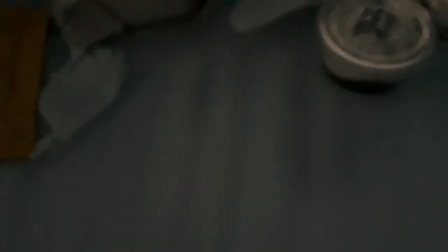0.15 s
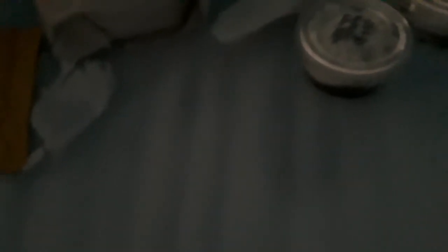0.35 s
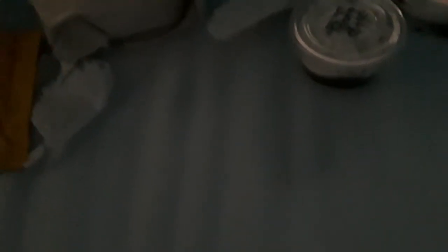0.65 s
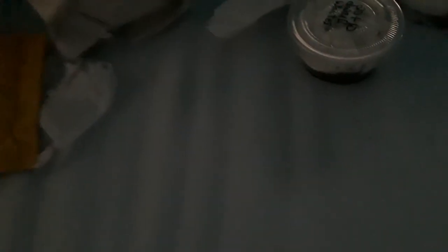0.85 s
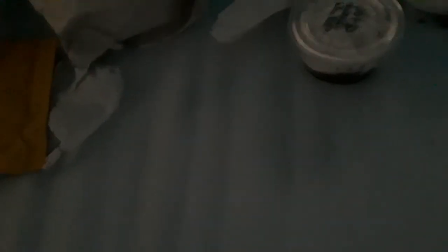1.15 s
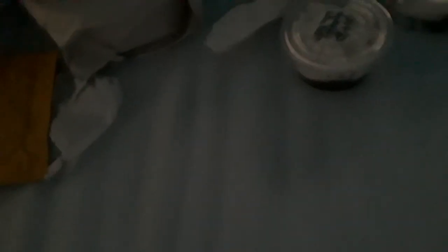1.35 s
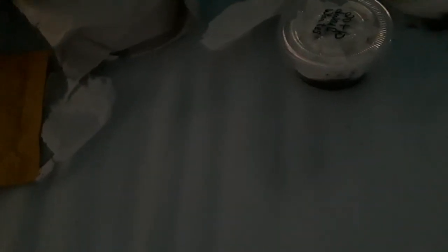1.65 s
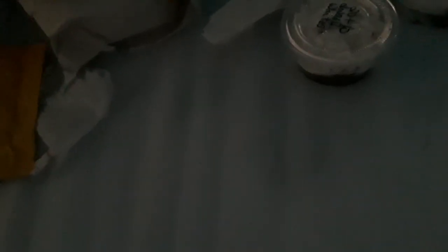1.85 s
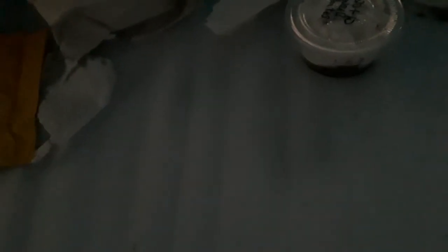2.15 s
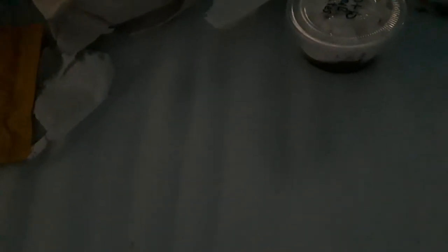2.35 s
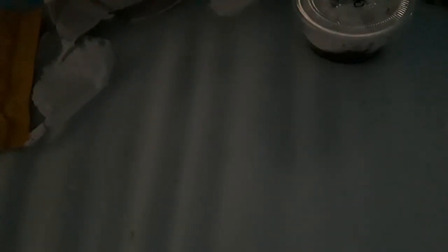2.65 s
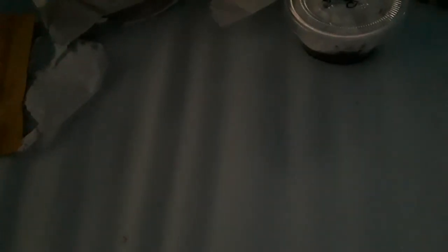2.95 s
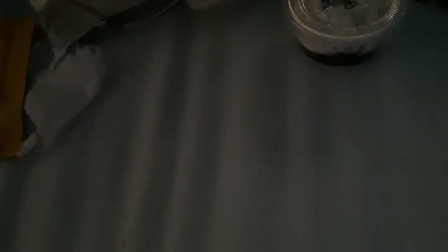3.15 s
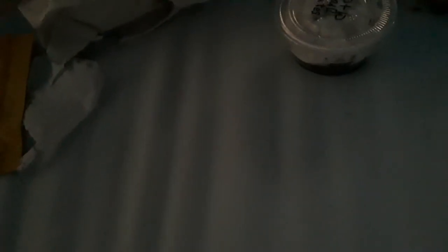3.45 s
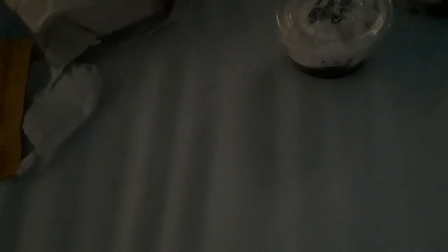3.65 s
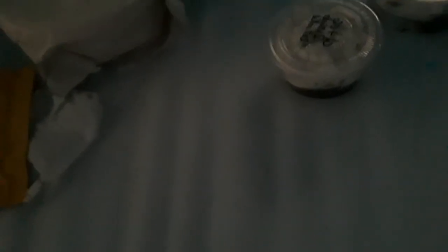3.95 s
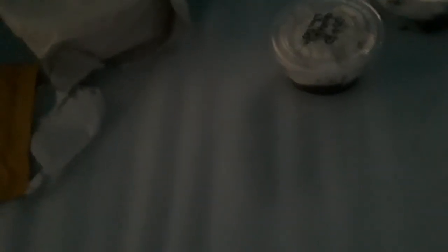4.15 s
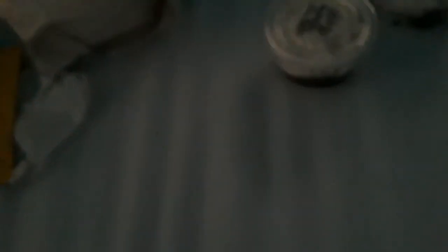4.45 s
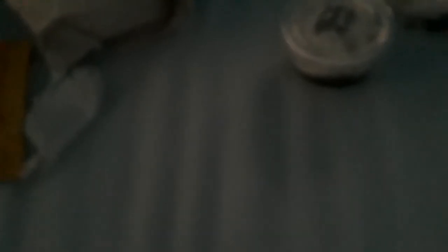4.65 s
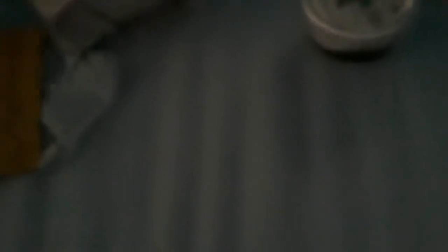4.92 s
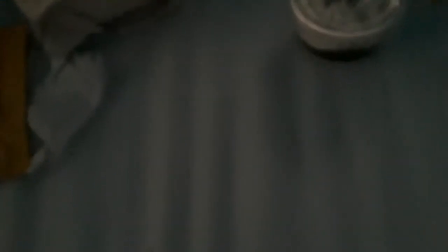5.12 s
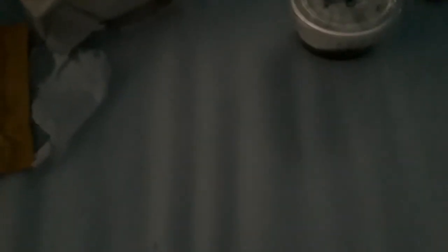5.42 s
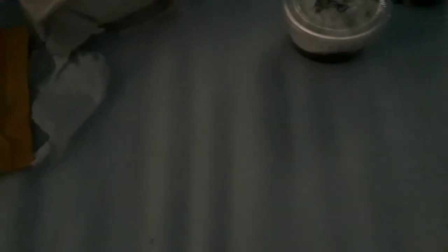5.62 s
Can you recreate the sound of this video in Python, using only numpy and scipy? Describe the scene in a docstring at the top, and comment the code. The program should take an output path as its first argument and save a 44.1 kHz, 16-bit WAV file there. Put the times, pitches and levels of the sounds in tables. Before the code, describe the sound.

Stiff packing paper rustles close to the microphone, with scattered bright cracks and soft flaps as it is drawn out of a box. It pauses briefly, then builds into a dense run of crisp crinkling before ending in a few gentler swishes. The sound shifts a little between right and left, in a quiet room with a short, soft echo and light hiss.

```python
"""In a quiet furnished room, hands pull stiff crumpled packing paper out of a box, close to a phone.
Sheets flap with low puffs and slide with a grainy rustle; creases snap in short bright cracks.
The room adds a soft echo and a faint hiss. The phone has two microphone holes (ports), and its body
shades the left one from treble. The paper moves from the phone's right side to its left end."""
import sys
import numpy as np
from scipy import signal
from scipy.fft import rfft, irfft
from scipy.io import wavfile
from scipy.ndimage import uniform_filter1d, map_coordinates

SR = 44100
rng = np.random.default_rng(int(sys.argv[2]) if len(sys.argv) > 2 else 0)


def to_wav(s):
    """Save 16-bit WAV."""
    ch = np.atleast_2d(s).T  # columns
    pcm = np.round(np.clip(ch, -1, 1) * 32767)  # PCM
    wavfile.write(sys.argv[1], SR, pcm.astype(np.int16))


N = 254898
TIME = np.arange(N) / SR
HALF_OCTAVES = 45 * 2 ** np.arange(0, 8.6, .5)  # band centres in Hz
# snapping creases: start_s, snap_db (2.5-7 kHz), ring_hz, body_db, fizz_db (both relative to the snap)
CREASES = [(0.038, -29.5, 5150, -15, -12), (0.068, -36, 3840, -7, -3), (0.22, -42.5, 4450, 2, 6),
           (0.2656, -33.5, 3000, -7.5, -3), (0.6843, -41.5, 6340, -39, 20), (0.6955, -37, 6230, -28, 16),
           (0.7446, -32.5, 5000, -3, -22), (0.9183, -47, 4930, -3, 8), (1.015, -26.5, 4310, -3.5, -0.5),
           (1.1188, -23, 4900, -10, 5.5), (1.1259, -32, 1220, 0, -15), (1.135, -21.5, 4010, -16, -0.5),
           (1.146, -28, 4220, -9, -26), (1.1872, -21.5, 4240, -11.5, -19), (1.2305, -33, 850, -3, 6.5),
           (1.3825, -27, 1080, -4, -4.5), (1.49, -35.5, 5200, -14.5, -11.5), (1.6971, -26, 5400, -9.5, -14),
           (1.8722, -31, 4100, -3.5, -1.5), (1.9101, -16.5, 5200, -24, -2.5),
           (1.9252, -22, 5200, -11, -3.5), (1.9992, -24.5, 770, -12, -4.5), (2.562, -67, 2060, 17.5, -15),
           (2.759, -54, 5660, -5, -7), (2.925, -37.5, 3790, -9, -4), (2.938, -32.5, 3520, -8, -4),
           (2.9532, -27.5, 3750, -11, -25), (2.9937, -25, 4200, -12, 3.5), (3.0119, -38.5, 4750, 7, 12),
           (3.0946, -18.5, 4820, -13.5, 0.5), (3.1583, -28.5, 4220, 1.5, 8.5), (3.2047, -16, 5200, -12, 2),
           (3.2404, -38, 5510, -10, 8), (3.326, -21.5, 4450, -9.5, -18), (3.3753, -23, 5200, -12.5, -5),
           (3.3873, -27, 5420, -3.5, 11.5), (3.42, -15.5, 4440, -19.5, -5),
           (3.4408, -22.5, 5040, -5.5, 4.5), (3.481, -32.5, 5550, -18, 8), (3.485, -33.5, 4460, -2.5, -5.5),
           (3.586, -27, 5500, -14, -17), (3.6002, -23.5, 4570, -10, 2), (3.6207, -31.5, 4800, -12, 7),
           (3.6256, -31, 4540, -23, -16), (3.6427, -24, 4880, -12, 10), (3.6888, -26.5, 5100, -17, -8),
           (3.703, -18, 3700, -24, -8.5), (3.754, -38.5, 5750, -11, 16.5), (3.7838, -30, 3080, -13, 6),
           (3.789, -31, 2650, -24, 4), (3.7998, -17, 1700, -18, -11), (3.8337, -22.5, 1500, -3.5, -3),
           (3.838, -29.5, 1420, -3, -8), (3.846, -30, 1610, -15, -3), (3.86, -25.5, 1730, -11, 3),
           (3.8912, -26, 5710, -24, 5), (3.8949, -21.5, 1750, -28, 0), (3.9157, -22, 4630, -21, -3),
           (3.9252, -23, 4870, -10, -1), (3.943, -24.5, 4220, -7, 1), (3.9692, -22, 6300, -26, 1),
           (4.0195, -17, 3830, -8, 0), (4.0247, -35, 4180, -23, -9), (4.0315, -24, 2520, -15, -11),
           (4.0645, -43, 4890, -7, -10), (4.0762, -18, 5600, -13, -18), (4.09, -19, 5700, -26, -3),
           (4.1049, -22, 5400, -14, 5.5), (4.1144, -30.5, 5100, -12.5, 7), (4.1272, -29, 4970, -9, -5),
           (4.137, -26, 2730, -25, 5.5), (4.1525, -23.5, 3950, -1, -4), (4.1756, -14.5, 4160, -16, -13.5),
           (4.195, -21, 4050, -30, 1.5), (4.207, -29, 4540, -5.5, 7), (4.218, -38, 4650, -13, -16),
           (4.2413, -25, 2860, -9.5, -10), (4.2487, -22, 2180, -20, -7), (4.2548, -24.5, 4400, -7, -12),
           (4.266, -23, 2280, -20, -2), (4.2718, -26.5, 3000, -15, -7), (4.311, -25, 2300, -14, -11),
           (4.3152, -18.5, 2600, -9, -1), (4.3284, -24, 2520, -9, -28), (4.3705, -28.5, 3900, -2, -25),
           (4.394, -24.5, 2660, -10, -19), (4.4077, -32, 2760, -24, -16), (4.4296, -36, 5430, -26, -22),
           (4.4533, -20, 2000, -13, -13), (4.4697, -23.5, 1670, -14, 5), (4.503, -35.5, 6160, -27, 12.5),
           (4.5174, -50, 4770, -13.5, 1), (4.5526, -29.5, 2000, -13, -8), (4.5687, -21, 2170, -21.5, -11.5),
           (4.632, -19, 2380, -30, -12), (4.6784, -39.5, 6850, -1.5, 18), (4.688, -32, 4260, -7.5, -17),
           (4.694, -26.5, 4080, -17, -15.5), (4.7141, -21.5, 2600, -30, -14),
           (4.7463, -33.5, 4700, -19, -7), (4.9013, -50.5, 4470, -14.5, 2)]


def undb(db):
    return 10 ** (np.asarray(db) / 20)


def at(table, hz):
    """Reads a table of pitch_hz, value at any pitch."""
    pitch_hz, value = np.transpose(table)
    return np.interp(np.log(hz), np.log(pitch_hz), value)


def curves(table):
    """Turns rows of time_s, values into one curve per value."""
    time_s, *columns = np.transpose(table)
    return [np.interp(TIME, time_s, c) for c in columns]


def band(x, hz):
    """Keeps half an octave around hz."""
    edges = [hz * 2 ** -.25, min(hz * 2 ** .25, .45 * SR)]
    return signal.sosfilt(signal.butter(2, edges, "band", fs=SR, output="sos"), x)


def colour(hz, four_db):
    """Level per Hz at one pitch, blended from four ranges: thud, body, rustle, fizz."""
    # middle of each range: pitch_hz
    centres = (250, 1100, 4200, 11000)
    # size of each range: width_hz
    widths = (380, 1400, 4500, 7000)
    per_hz = four_db - 10 * np.log10(widths)[:, None]
    place = np.interp(np.log(hz), np.log(centres), np.arange(4))
    k = min(int(place), 2)
    return per_hz[k] + (place - k) * (per_hz[k + 1] - per_hz[k])


def wobble(rate_hz):
    """A smooth random wobble with a typical size of 1."""
    k = int(SR / rate_hz)
    steps = np.repeat(rng.standard_normal(N // k + 1), k)
    smooth = uniform_filter1d(uniform_filter1d(steps, k), k)[:N]
    return smooth / np.std(smooth)


def pair(noise, alike):
    """Left and right noise, partly shared."""
    return np.sqrt(alike) * noise[0] + np.sqrt(1 - alike) * noise[1:]


def bursts(starts, sizes, decay_s, rise_s):
    """A loudness curve that jumps up at each start and dies away."""
    kicks = np.bincount(starts, sizes, N)[:N]
    fall, rise = np.exp(-1 / (decay_s * SR)), np.exp(-1 / (rise_s * SR))
    return signal.lfilter([1 - rise], np.convolve([1, -fall], [1, -rise]), kicks)


def room_tone(level_db=-64):
    """Distant air and the hiss of the electronics waver a little."""
    # tone of the hiss: pitch_hz, relative_db
    air = [(15, -52), (25, -23.5), (200, -5), (309, -5.5), (363, -15.5), (840, -9.5), (988, -10),
           (1070, -13), (7920, -28), (16000, -22)]
    # how alike it is at both ports: pitch_hz, share
    alike = [(60, 0.26), (130, 1), (300, 0.24), (700, 0.18), (1400, .01)]
    noise, hiss = rng.standard_normal((2, 3, N)), 0
    for k, hz in enumerate(HALF_OCTAVES):
        gain = undb(at(air, hz) + 0.36 * wobble(5.4))
        hiss += band(gain * pair(noise[k % 2], at(alike, hz)), hz)
    hiss *= undb([[-.8], [.8]])
    return hiss * undb(level_db) / np.sqrt(np.mean(hiss ** 2))


def room_echo(sound, level_db=-13.5):
    """Walls and furniture send back a soft tail, different at each port."""
    # time to fade by 60 dB: pitch_hz, fade_s
    fades = [(200, 0.13), (1000, 0.18), (2500, 0.46), (12000, 0.16)]
    t = TIME[:SR // 2]
    tail = sum(band(rng.standard_normal((2, len(t))), hz) * undb(-60 * t / at(fades, hz))
               for hz in HALF_OCTAVES)
    tail *= np.clip(t / 0.0066, 0, 1)
    tail /= np.sqrt(np.mean(np.sum(tail ** 2, axis=1)))
    return undb(level_db) * signal.fftconvolve(sound.mean(axis=0, keepdims=True), tail, axes=1)[:, :N]


def through_ports(x):
    """The hollow behind each port boosts some pitches and weakens others."""
    # tone of the hollows: pitch_hz, gain_db
    tone = [(25, -27), (70, -17.5), (130, -2), (250, -1), (2500, 0), (3500, -1), (4600, 1), (6000, -1.5),
            (8000, -5), (10500, 1), (15000, -2.5)]
    hz = np.maximum(np.fft.rfftfreq(N, 1 / SR), 1)
    return irfft(rfft(x, axis=1) * undb(at(tone, hz)), N, axis=1)


def phone_shadow(hz, samples=slice(None)):
    """Left and right gain: the phone blocks high pitches most."""
    # left minus right as the paper moves: time_s, treble_db, body_db
    balance = [(0, -4, 3.5), (.6, -0.5, 1.5), (.7, -8, 3.3), (2.0, -9, 3.8), (2.5, 4, 12), (2.8, -11, 1.7),
               (3.7, -10.5, 2.2), (3.85, -8, 5.3), (4.1, 0.5, 6.7), (4.8, -1, 3), (5.2, -3, 3.1),
               (5.78, -3.5, 2.7)]
    # how much of body_db applies: pitch_hz, factor
    low_shade = [(150, 0.55), (1000, 1)]
    # how much of treble_db minus body_db is added: pitch_hz, factor
    high_shade = [(1500, 0.14), (2500, 0.042), (4400, 1.057), (8000, 1.305), (15000, 1.57)]
    treble_db, body_db = (c[samples] for c in curves(balance))
    pan_db = body_db * at(low_shade, hz) + at(high_shade, hz) * (treble_db - body_db)
    return undb(np.array([pan_db, -pan_db]) / 2)


def flaps(hz):
    """Loudness in one band as whole sheets flap and push low puffs of air."""
    # puffs: start_s, level_db, pitch_hz
    puffs = [(0.108, -40, 350), (1.007, -42.5, 228), (1.231, -39, 330), (1.379, -46, 577),
             (1.492, -55, 432), (1.693, -44.5, 432), (1.906, -37, 232), (3.165, -52, 500),
             (3.384, -46, 307), (3.638, -43, 316)]
    start_s, level_db, pitch_hz = np.transpose(puffs)
    size = undb(level_db - 27 - 7 * np.log2(hz / pitch_hz) ** 2)
    return bursts(((start_s + 1 / pitch_hz) * SR).astype(int), size, 0.0051, 0.0007)


def slides(grip_s=0.0043, stop_s=0.062):
    """Sheets slide over each other; gives the four range levels and the crispness over time."""
    # slides: start_s, swell_s, fade_s, first_db, middle_db, last_db (all three at 2.5-7 kHz),
    # thud_db, body_db, fizz_db (relative to those), crispness (0-1)
    strokes = [(0.0, 0.11, 0.22, -45, -45, -59, -14, -7, -1.5, 0.27),
               (0.109, 0.021, 0.046, -55, -50, -69, 9, 6.5, 9, 0.4),
               (0.47, 0.17, 0.028, -75, -60, -74, -10, -11, 0, 0.15),
               (0.683, 0.11, 0.096, -47.5, -42, -47.5, -10.5, -7.5, 1.5, 0.26),
               (0.9, 0.19, 0.13, -51, -44, -47.5, -17, -7.5, -3.5, 0.31),
               (1.24, 0.012, 0.04, -46, -48.5, -47.5, -14, -15, -1.5, 0),
               (1.31, 0.071, 0.16, -63, -60, -69, -9, -7.5, -8.5, 0.4),
               (1.49, 0.011, 0.092, -52, -52.5, -66, -11, -9, -12, 0),
               (1.599, 0.2, 0.19, -61.5, -53, -49.5, -17, -10, -3.5, 0.24),
               (2.022, 0.042, 0.019, -69, -76, -67.5, 3.5, -7, 5.5, .2),
               (2.544, .03, 0.17, -72, -71, -65.5, 1, -0.5, -10.5, 0.5),
               (2.759, 0.045, 0.099, -56, -53.5, -51.5, -6.5, -1, 2, 0.52),
               (2.92, 0.27, .24, -49.5, -46.5, -49, -12, -6, -2.5, 0.45),
               (3.3, 0.082, 0.19, -44, -40, -56.5, -13, -6.5, -4, 0.83),
               (3.52, 0.051, 0.28, -48, -45.5, -51.5, -16.5, -5, -2.5, 0.68),
               (3.83, 0.093, 0.1, -37, -34.5, -35.5, -23.5, -2.5, -5.5, 0.89),
               (4.015, .01, 0.043, -40, -36, -44, -29, -4, -5, 1),
               (4.06, 0.064, 0.14, -32, -28, -38, -29, -13.5, -8, 0.98),
               (4.24, 0.07, 0.23, -39, -31.5, -43.5, -27, -13.5, -8.5, 0.86),
               (4.449, 0.029, .07, -37, -31.5, -58, -28, -19, -5.5, .95),
               (4.56, 0.16, 0.2, -52.5, -42, -70, -25, -15.5, -7, .95),
               (4.97, 0.15, 0.15, -70, -50, -67.5, -11, -9.5, -2.5, 0.31),
               (5.275, 0.25, 0.23, -56, -44, -55, -9.5, -4.5, -4, 0.28),
               (5.637, 0.038, 0.026, -44, -43.5, -53, -15, -0.5, -7.5, 0),
               (5.71, 0.033, 0.044, -53, -51, -50, -11, -2, -5.5, .1)]
    start, swell, fade, first, middle, last, thud, body, fizz, crisp = np.transpose(strokes)
    zero = 0 * start
    corners_s = np.cumsum([start - grip_s, zero + grip_s, swell, fade, zero + stop_s], axis=0).T
    corners_db = np.transpose([zero - 95, first, middle, last, zero - 95])
    power = undb([2 * np.interp(TIME, s, db) for s, db in zip(corners_s, corners_db)])
    levels_db = 10 * np.log10(undb(2 * np.array([thud, body, zero, fizz])) @ power)
    return levels_db, crisp @ power / power.sum(axis=0)


def rustle(hz, levels_db, crisp, ticks, shiver_db):
    """Loudness in one band as fibres scrape and tiny buckles tick, each at its own pitch."""
    when, strength, pitch = ticks.T
    tick_hz = 1200 * 6 ** pitch
    in_band = np.exp(-(np.log2(hz / tick_hz) / 0.18) ** 2)
    size = undb(-3 * np.log(strength) + 6.7 * in_band - 1.5)
    grain = bursts((when * N).astype(int), size, 0.00078, 0.000099)
    db = colour(hz, levels_db) + shiver_db + wobble(24.89) + 1
    db -= 2 * crisp * np.clip(np.log2(1300 / hz), 0, 1)  # buckles are too small to push much bass
    return undb(db) * (1 - 0.69 * crisp + crisp * min(hz / 1500, 1) * grain)


def cracks(hz):
    """Loudness in one band as creases flip, then the sheet shakes out and settles."""
    start_s, snap, _, body, fizz = np.transpose(CREASES)
    size = undb(snap + colour(hz, np.array([body - 17, body, 0 * snap, fizz])) + 4)
    starts = (start_s * SR).astype(int)
    slow = (4000 / hz) ** 0.28  # larger panels sound lower and move for longer
    flip = bursts(starts, size, 0.00061 * slow, 0.00075)
    shake = undb(-18.5) * bursts(starts, size, 0.004 * slow, 0.0042)
    settle = undb(-37.5) * bursts(starts, size, 0.014, 0.0065)
    return flip + shake + settle


def panel_rings():
    """The flat panel beside each crease rings briefly, its pitch sagging as it relaxes."""
    start_s, snap, ring_hz, body, _ = np.transpose(CREASES)
    starts, age = (start_s * SR).astype(int), np.arange(512)
    cycles = age / SR * ring_hz[:, None]
    chance = rng.random((len(starts), 2))
    # the hands stop large panels within fewer cycles
    length = 1.97 * (ring_hz[:, None] / 4000) ** 0.65 * (0.57 + 0.74 * chance[:, :1])
    envelope = cycles / length * np.exp(1 - cycles / length * 1.11)
    ring = envelope * np.sin(2 * np.pi * (cycles * (1 - 0.00033 * cycles) + chance[:, 1:]))
    lowness = np.clip(np.log2(3000 / ring_hz), 0, 1)  # a low panel carries the body of the snap
    gains = undb(snap + body * lowness + 5) * phone_shadow(ring_hz, starts)
    places = np.minimum(starts[:, None] + age, N - 1).ravel()
    return np.array([np.bincount(places, (g[:, None] * ring).ravel(), N) for g in gains])


def paper(ticks_per_s=250):
    """Rustles, cracks and flaps shape noise, half an octave at a time."""
    # how alike the paper is at both ports: pitch_hz, share
    alike = [(100, 0.79), (1000, 0.81), (3000, 0.17), (10000, 0.11)]
    noise = rng.standard_normal((2, 3, N))  # two sets, so neighbouring bands differ
    ticks, shiver_db = rng.random((int(ticks_per_s * N / SR), 3)), 1.2 * wobble(40)
    levels_db, crisp = slides()
    out = 0
    for k, hz in enumerate(HALF_OCTAVES):
        motion = rustle(hz, levels_db, crisp, ticks, shiver_db) + cracks(hz) + flaps(hz)
        sound = band(motion * phone_shadow(hz) * pair(noise[k % 2], at(alike, hz)), hz)
        out += np.roll(sound, -int(SR / hz), axis=1)  # all pitches of a snap start together
    return out * np.sqrt(SR / 2)


def scene():
    """The moving paper and its echo enter the phone, over the room's hiss."""
    # how much later the left port hears the paper: time_s, delay_ms
    left_delay = [(0, -0.31), (.5, -0.14), (2.3, -0.11), (2.8, .1), (3.72, 0.129), (3.95, -0.42),
                  (5.78, -0.41)]
    near = paper() + panel_rings()
    lag = curves(left_delay)[0] * SR / 1000
    near[0] = map_coordinates(near[0], [np.arange(N) - lag], order=3, mode="nearest")
    return through_ports(near + room_echo(near)) + room_tone()


def record(dry):
    """The phone cuts the highest treble."""
    top_cut = signal.ellip(10, .2, 60, 15750, fs=SR, output="sos")
    return np.clip(signal.sosfilt(top_cut, dry), -1, 1)


dry = scene()
out = record(dry)
to_wav(out)
```